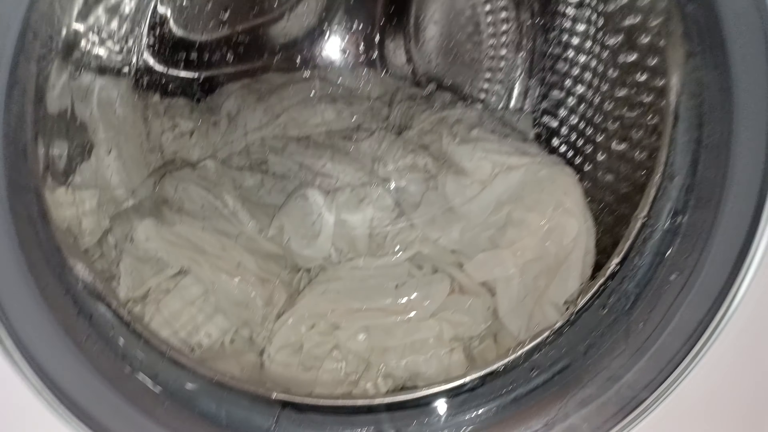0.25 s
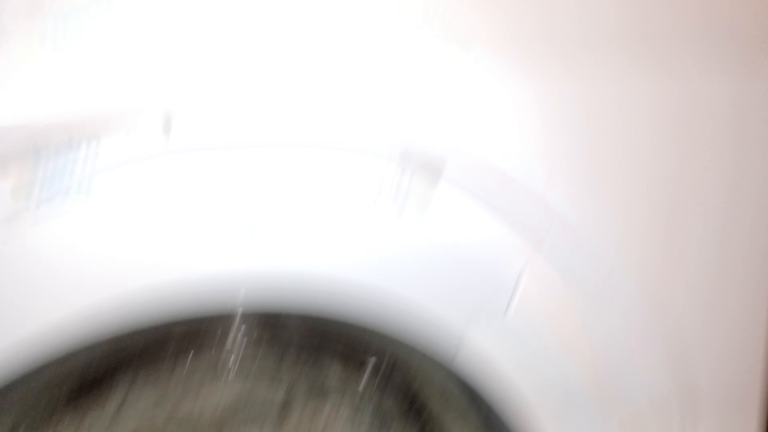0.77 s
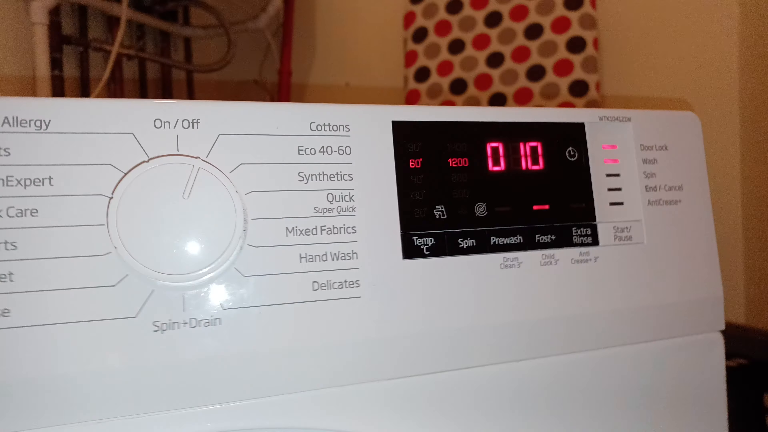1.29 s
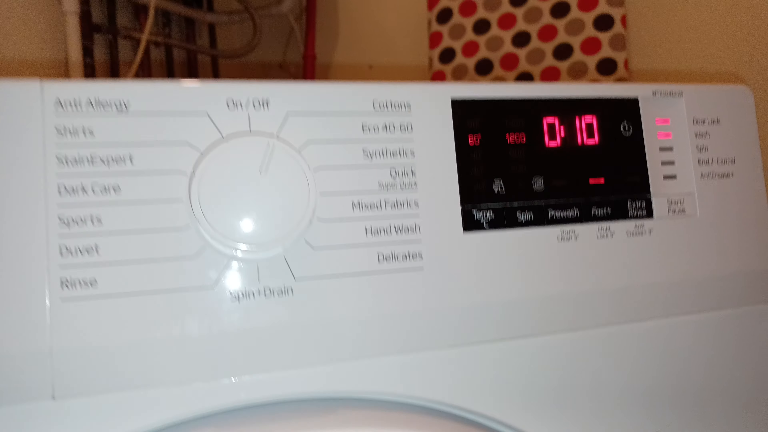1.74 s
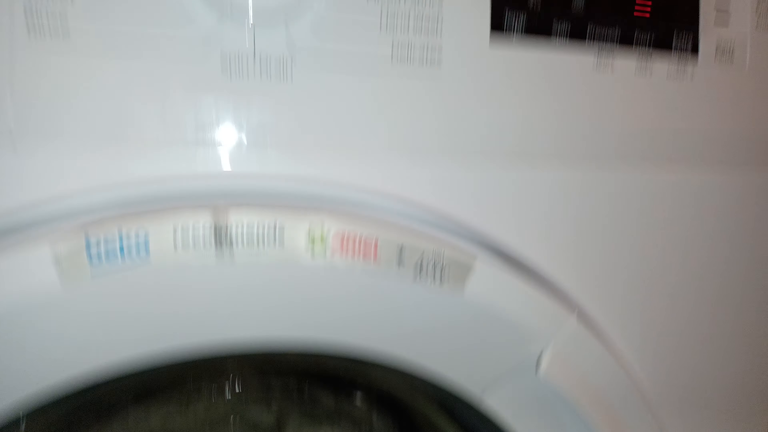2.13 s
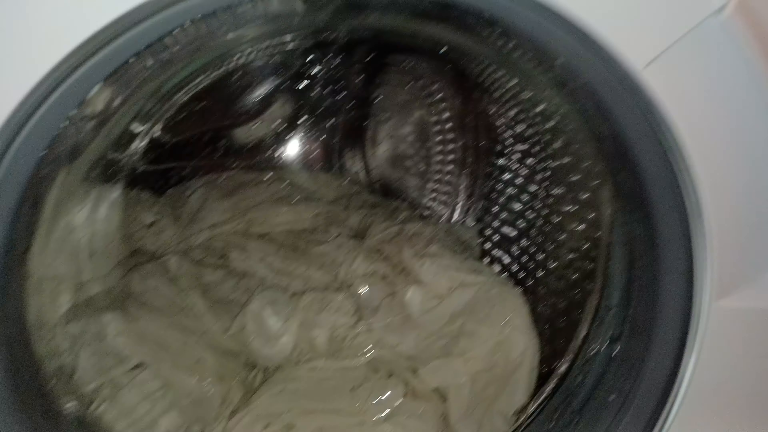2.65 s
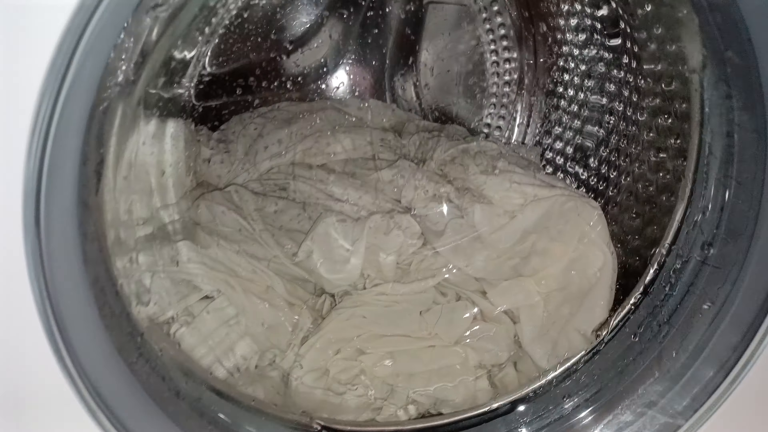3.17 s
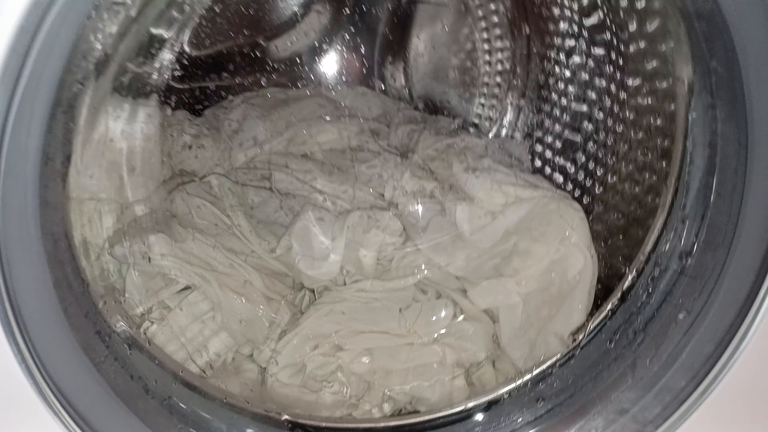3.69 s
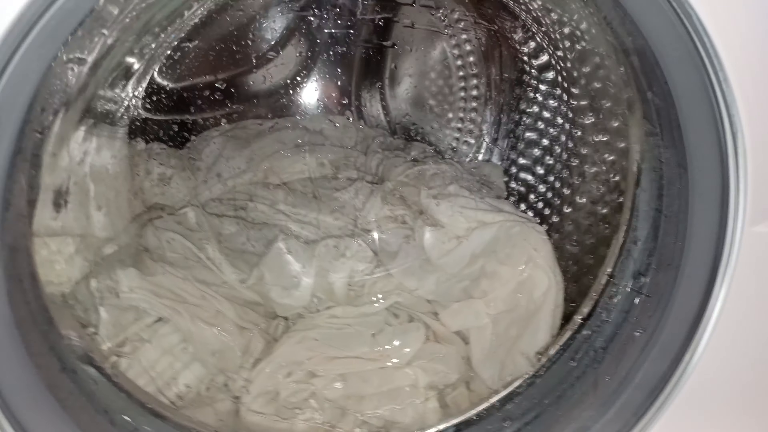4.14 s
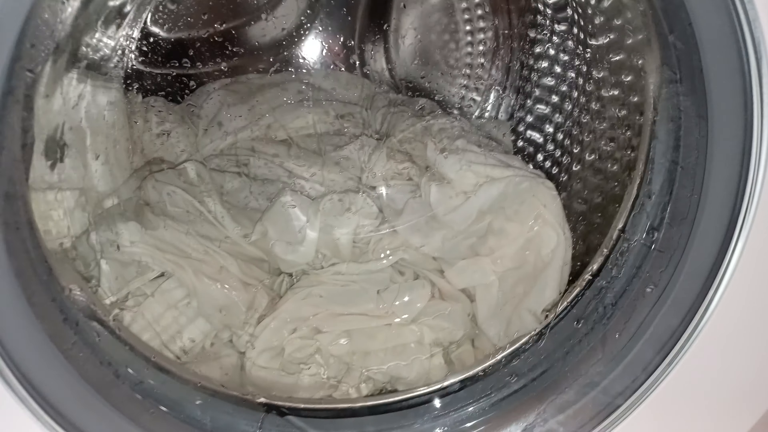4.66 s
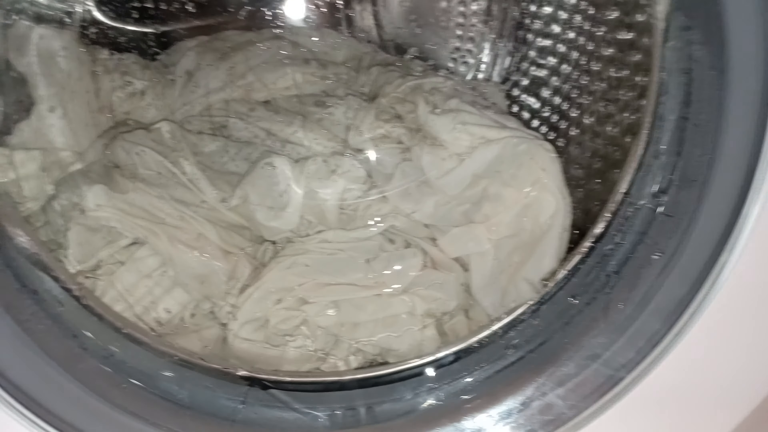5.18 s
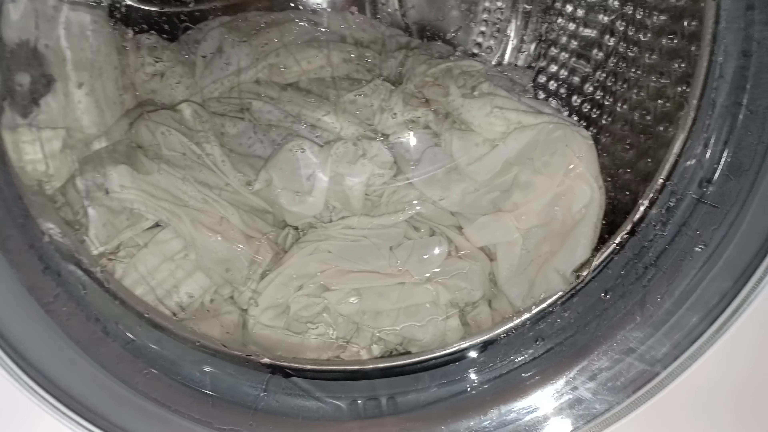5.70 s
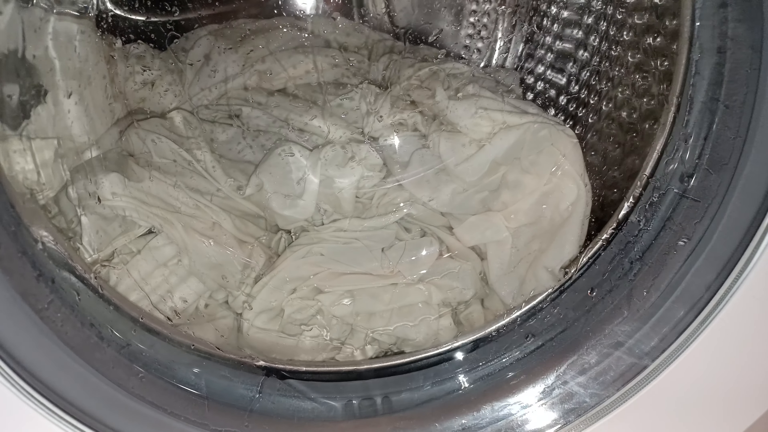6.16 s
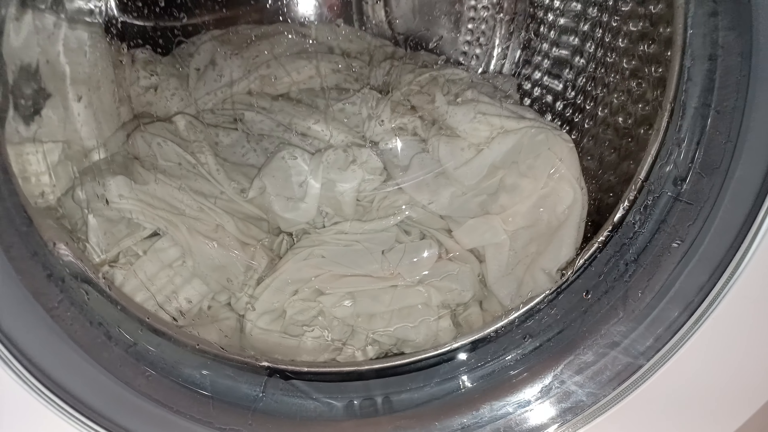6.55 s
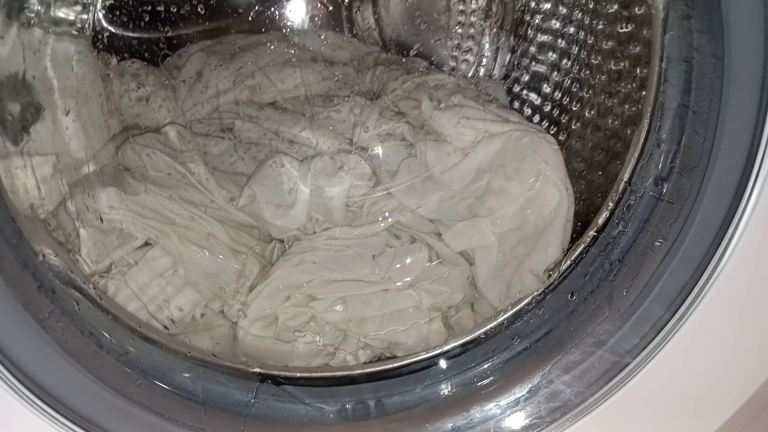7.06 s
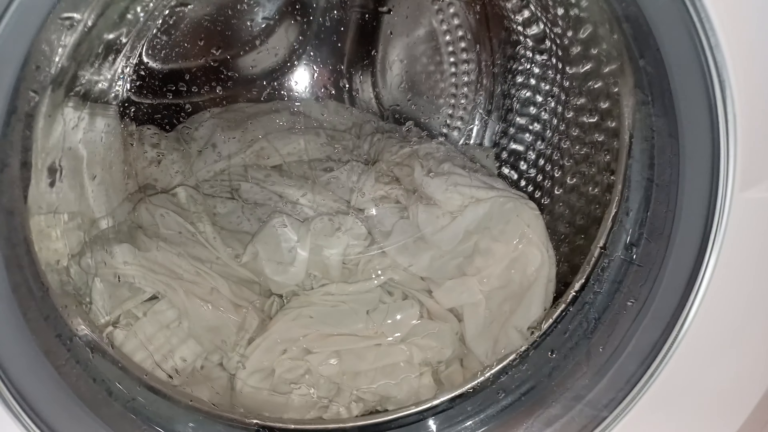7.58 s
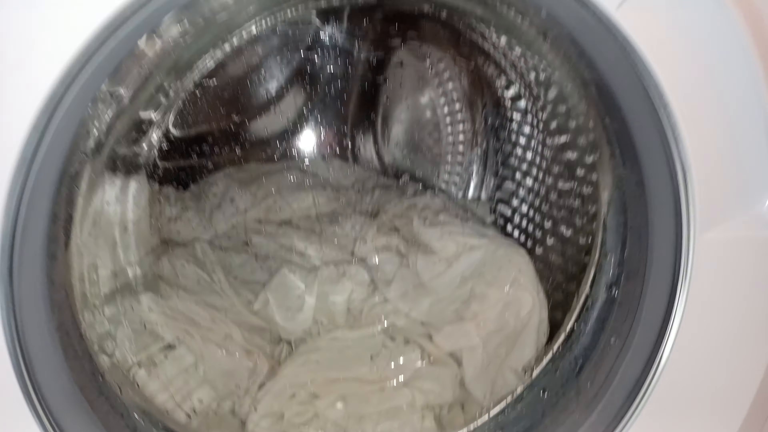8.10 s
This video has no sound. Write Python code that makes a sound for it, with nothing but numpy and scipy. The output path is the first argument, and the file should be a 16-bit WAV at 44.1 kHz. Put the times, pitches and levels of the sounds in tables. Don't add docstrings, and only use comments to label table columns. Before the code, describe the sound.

A washing machine drains in a small room, its drum still, heard about an arm's length away in stereo. Throughout, a low electric pump hum with a rough buzz sits over cabinet rumble and a broad, watery churn. From 0.1 to 0.45 s dull floor knocks come in a quick cluster, ending in the heaviest thud, with a splash. Two more thuds fall near 1.05 s, a softer group at 1.9 s with shuddering rumble, and faint ones near 2.55 and 3.2 s. The microphone turns aside around 1 to 2.5 s, subtly changing the tone; cloth rustles briefly at 2.55 s. From 3 to 5.5 s it nears the pump, the hum grows fuller and short wavering whistles around 1.5 kHz flutter from the hose, with a gulping slap at 4.5 s. After 6 s it draws back; whistles weaken, flaring at 6.7 and 7.7 s. Small drips tick near 7.4 s, and brighter wash and rustle close the sound at 8.3 s.

```python
import sys
import numpy as np
from scipy import signal
from scipy.io import wavfile
from scipy.ndimage import uniform_filter1d

SR = 44100
rng = np.random.default_rng(int(sys.argv[2]) if len(sys.argv) > 2 else 0)


def persist_wave(psi):
    counts = np.round(np.clip(psi, -1, 1) * 32767).astype(np.int16)
    wavfile.write(sys.argv[1], SR, np.atleast_2d(counts).T)


def natural_amplitude(level_db):
    exponent = np.asarray(level_db, float) / 20
    return 10 ** exponent


N = 367353
T = np.arange(N) / SR
MAINS_HZ = 49.987


def evened(x):
    return x / np.sqrt(np.mean(x ** 2) + 1e-20)


def read(points, hz):
    f, value = np.transpose(points)
    return np.interp(np.log(hz + 1), np.log(f + 1), value)


def curves(rows, t):
    s, *columns = np.transpose(rows)
    return [np.interp(t, s, c) for c in columns]


def sides(pan_db):
    pan_db = np.atleast_1d(pan_db)
    gains = natural_amplitude(np.array([pan_db / 2, -pan_db / 2]))
    return gains / np.sqrt((gains ** 2).mean(0))


def drift(top_hz):
    hz = np.geomspace(.1, top_hz, num=16)[:, None]
    t = T[::256]
    waves = np.sin(2 * np.pi * (hz * t + rng.random(hz.shape))) / np.sqrt(hz)
    return np.interp(T, t, evened(waves.sum(0)))


def bumps(t, s, db, half):
    s, db, half = (np.reshape(v, (-1, 1)) for v in (s, db, half))
    return (db * np.exp(-((t - s) / half) ** 2)).sum(0)


# (time [s], turned aside [0-1], close to the pump [0-1], drawn back [0-1])
HAND = [(0, 0, 0, 0), (.7, .1, 0, 0), (1.05, .85, 0, 0), (1.6, 1, 0, 0), (2.2, .9, .1, 0),
        (2.75, .05, .35, 0), (3.2, 0, .5, 0), (4.2, 0, .8, 0), (5.1, 0, 1, 0), (5.7, 0, 1, .25),
        (6.3, 0, 1.05, .7), (6.8, 0, 1, 1), (7.5, 0, .8, 1.05), (8.33, 0, .5, 1)]


def placed(rule, t):
    rest, *changes = rule
    return rest + np.dot(changes, curves(HAND, t))


# (frequency [Hz], correlation [-1 to 1])
LIKENESS = [(60, 1), (200, 0.89), (340, 0.75), (480, 0.072), (700, 0.15), (1100, 0.098), (1550, .15),
            (2050, 0.024), (2450, 0.96), (3500, 0.026)]
# (frequency [Hz], left minus right [dB])
BALANCE = [(60, 0), (99, 1.5), (160, -5), (270, 1.5), (450, -0.5), (740, 1.5), (1220, -2), (2010, -2.0),
           (3330, -3), (5500, -3.5), (9080, -1.5), (15000, 1.5)]
# (frequency [Hz], lead of the right side [rad])
RIGHT_LEAD = [(450, 0), (700, 1.5), (1050, -.4), (1700, -1.2), (2350, 1.4), (3100, 2.2)]


def noise(shape_db, size, patchy_db, flicker_db):
    frames = 4 * N // size + 5
    hz = np.fft.rfftfreq(size, 1 / SR)[:, None]
    t = np.arange(frames) * size / 4 / SR
    a, b, c, d, patches = rng.standard_normal((frames, len(hz), 5)).T
    patches = uniform_filter1d(patches, size=10, axis=0)
    patches = evened(uniform_filter1d(patches, size=10, axis=1))
    flicker = evened(uniform_filter1d(rng.standard_normal(frames), size=6))
    same = np.clip(read(LIKENESS, hz), -1, 1)
    left, other = a + 1j * b, c + 1j * d
    right = same * np.exp(1j * read(RIGHT_LEAD, hz)) * left + np.sqrt(1 - same ** 2) * other
    z = np.array([left, right]) * sides(read(BALANCE, hz))
    z *= natural_amplitude(shape_db(hz, t) + patchy_db * patches + flicker_db * flicker)
    return signal.istft(z, nperseg=size, noverlap=3 * size // 4)[1][:, :N] / size


def room(x, t60, wet_db, top_hz):
    t = np.arange(SR // 4) / SR
    tail = rng.standard_normal((2, len(t))) * natural_amplitude(-60 * t / t60) * (t > .002)
    tail /= np.linalg.norm(tail, axis=1, keepdims=True)
    tail = signal.lfilter(*signal.butter(2, top_hz, fs=SR), tail)
    return x + natural_amplitude(wet_db) * signal.oaconvolve(x, tail, axes=1)[:, :N]


def tone(order, db, lag=0., lead=0.14):
    turn = 2 * np.pi * order * MAINS_HZ * T - lag
    return np.sqrt(2) * natural_amplitude(db) * np.cos([turn, turn + lead])


ORDER_LEVELS = {2: (-45, 3.5, 4, .5), 3: (-49.5, -7.5, 3.5, -13.5), 4: (-43.5, -2, 6, .3),
                6: (-50.5, 2.8, 6.3, .3), 9: (-59.5, 4, -2, -5.5), 11: (-55, 4.5, -.5, -3.5),
                13: (-55.5, -1.5, -2.5, .5), 15: (-61, 0, 3, 0), 16: (-66, -2, 9, -7), 17: (-63, -3, 4, 0),
                18: (-70, 1, 8, 3)}
ORDER_PANS = {4: (-3.5, -1, 1.5, 0), 6: (0, 1, 4, -1), 9: (-13, 26, -3, 4), 11: (-7, -2, -4, 7),
              13: (-9, 17, -5, 5), 15: (0, 0, -1, 3), 16: (-3, -1, -2, 1), 17: (-5, 5, -8, 0),
              18: (2, 0, 8, 6)}


def hum():
    second, third, fourth, sixth = (placed(ORDER_LEVELS[k], T) for k in (2, 3, 4, 6))
    pan4, pan6 = placed(ORDER_PANS[4], T), placed(ORDER_PANS[6], T)
    out = tone(2, second + .3 + .4 * drift(9), lag=-1.2) * sides(.5)
    out += tone(3, third + .8 * drift(9), lag=-1.7)
    out += tone(4, fourth + .4 + .4 * drift(9), lag=1.2, lead=.2) * sides(pan4)
    out += tone(6, sixth + 1.8 * drift(12), lag=-3.0, lead=-.19) * sides(pan6)
    return out


# (order, left level [dB], right level [dB])
FAINT_ORDERS = [(5, -59, -60), (7, -67, -65), (8, -65, -66), (12, -65, -62), (14, -62, -64), (19, -68, -64),
                (25, -69, -69)]


def buzz():
    turning_lead = np.interp(T, [2.1, 2.9], [.6, 2.6])
    panels = [(11, turning_lead), (9, 1.), (13, -.8), (15, 2.), (16, .5), (17, -2.), (18, 1.5)]
    out = np.zeros((2, N))
    for order, lead in panels:
        out += tone(order, placed(ORDER_LEVELS[order], T), lead=lead) * sides(placed(ORDER_PANS[order], T))
    for order, left_db, right_db in FAINT_ORDERS:
        levels_db = np.array([left_db + 3.5 * drift(1.5), right_db + 3.5 * drift(1.5)])
        lag, lead = 2 * np.pi * rng.random(2)
        out += tone(round(order), levels_db, lag, lead)
    return out


# (frequency [Hz], level [dB per Hz])
RUMBLE_SPECTRUM = [(25, -53), (50, -13), (63, -27), (82, 4), (97, -13), (125, 3), (145, -7), (180, -12),
                   (230, -9), (260, -4), (290, -3), (340, -13), (420, -28.5), (1200, -130)]
# (time [s], level [dB], half length [s])
SHUDDERS = [
    (.3, 5.5, 0.18),
    (1.95, 5.5, 0.21),
    (2.53, -2, .15),
]
RUMBLE_DB = (-48.5, -3.5, -1, 0)


def rumble():
    def shape_db(hz, t):
        level_db = placed(RUMBLE_DB, t) + bumps(t, *np.transpose(SHUDDERS))
        return read(RUMBLE_SPECTRUM, hz) + level_db + 70
    return noise(shape_db, size=4096, patchy_db=.7, flicker_db=.3)


# (frequency [Hz], level [dB per Hz])
CHURN_SPECTRUM = [(250, -15), (370, 3.5), (430, -6), (520, 0.5), (650, 1), (930, 1), (1000, 1), (2200, 1.5),
                  (2600, -0.5), (3100, -4.5), (5100, -7.5), (5800, -13.5), (8500, -29), (13000, -62)]
# (frequency [Hz], width [Hz], level [dB])
HOSE = [(1541, 34, 0), (1850, 40, -4), (2008, 40, -8)]
# (time [s], level [dB])
POCKETS = [(.32, 11), (2.65, 1), (3.04, 12), (3.25, 6), (3.39, 14), (3.6, 7), (3.88, 4), (4.08, 9.5),
           (4.22, 1), (4.48, 4), (5.08, 3), (5.54, -1), (6.08, 2), (6.7, 12), (7.07, 3), (7.31, 3),
           (7.66, 8), (7.79, 5)]
POCKET_S = 0.041
# (time [s], centre [Hz], level [dB], half length [s])
SPLASHES = [
    (.3, 2800, 4, 0.2),
    (.385, 2300, 6.5, 0.016),
    (1.743, 2210, 6, 0.052),
    (2.62, 2100, 6, .06),
    (4.245, 2400, 4, 0.021),
    (4.476, 1900, 9.5, 0.022),
    (7.8, 1720, 7, 0.016),
    (8.2, 4500, 2, .15),
]
CHURN_DB, WHISTLE_DB = (1, -0.58, 0.091, -1.3), (-5, -1, 8.5, -4.5)
LOW_DB, HIGH_DB = (3.5, 1.5, -1.5, -2), (0.54, -0.8, -0.4, -0.65)


def water():
    def shape_db(hz, t):
        level, low, high, whistle = (placed(rule, t) for rule in (CHURN_DB, LOW_DB, HIGH_DB, WHISTLE_DB))
        low_share = np.clip(2 * np.log2(700 / (hz + 1)), 0, 1)
        high_share = np.clip(2 * np.log2((hz + 1) / 2400), 0, 1)
        churn_db = read(CHURN_SPECTRUM, hz) + level + 0.37
        churn_db += low_share * (low - level) + high_share * (high - level)
        for s, centre_hz, db, half in SPLASHES:
            octaves = np.log2((hz + 1) / centre_hz)
            churn_db += np.exp(-(octaves / .3) ** 2) * bumps(t, s, db, half)
        flutter = evened(uniform_filter1d(rng.standard_normal(len(t)), size=14))
        flares_db = bumps(t, *np.transpose(POCKETS), POCKET_S) + .8 * flutter
        peaks = sum(natural_amplitude(db) / (1 + (2 * (hz - f) / width) ** 2) for f, width, db in HOSE)
        return 20 * np.log10(natural_amplitude(churn_db) + peaks * natural_amplitude(whistle + flares_db + 3.5))
    churn = noise(shape_db, size=1024, patchy_db=1.3, flicker_db=.3)
    return room(churn, t60=.25, wet_db=-5, top_hz=1200)


def sing():
    turn = 2 * np.pi * np.cumsum(HOSE[0][0] + 9 * drift(14)) / SR
    level_db = -62 + placed(WHISTLE_DB, T) + bumps(T, *np.transpose(POCKETS), POCKET_S)
    return np.sqrt(2) * natural_amplitude(level_db) * np.cos([turn, turn - 1]) * sides(-2)


# (time [s], blow [dB], pitch factor, upper modes [dB], ring factor)
KNOCKS = [(0.115, -43.5, 1.5, -3, 0.66), (0.132, -47, 0.9, 16, 2.1), (.178, -26, 1, -17, 1.1),
          (.198, -36, 0.9, 5, 1.2), (0.2386, -24.5, 1, -2, 1.1), (0.263, -40, .93, 10, 0.8),
          (0.3049, -22, 1.01, -7, 0.87), (0.384, -35.5, 1.1, 3.5, 1.9), (0.4234, -14, 0.99, -6.5, 0.84),
          (1.0238, -18.5, 1.03, -6.5, 1), (1.091, -19.5, 1.02, 0, 1.08), (1.114, -43, 1.1, 7.5, 3.2),
          (1.879, -22.5, 0.98, -5, 1.55), (1.905, -29.5, 1.28, -1, 1.5), (1.924, -34, 1.03, -1, 1.05),
          (1.95, -35.5, 1.22, 4, 0.92), (1.971, -37, 1.1, -3, 1.5), (2.045, -39, 1.14, 9, 1.2),
          (2.47, -45, 1.01, 9, 1.1), (2.553, -29.5, 1.05, -11, 0.79), (2.581, -36.5, 1.18, 5, 0.74),
          (3.158, -39, 1.05, -8, 1.2), (3.178, -28.5, 1.1, 0, 0.88), (3.203, -32, 1.1, -19, 1.1)]
# (frequency [Hz], level [dB], swell time [s])
FLOOR_LOW = [(122, -.3, .0105), (90, -18, .03), (61, -20, .045)]
FLOOR_HIGH = [(218, -.5, .0073), (250, -8, .004), (350, -15, .004)]


def knocks():
    t, out = np.arange(SR // 3) / SR, np.zeros((2, N + SR))
    for s, blow_db, pitch, upper_db, ring in KNOCKS:
        body = np.zeros(len(t))
        for modes, db, lead in ((FLOOR_LOW, blow_db, -.8), (FLOOR_HIGH, blow_db + upper_db, .9)):
            for hz, mode_db, swell in modes:
                u = t / (swell * ring)
                envelope = (u * np.exp(1 - u)) ** 2
                body -= natural_amplitude(db + mode_db) * envelope * np.sin(2 * np.pi * hz * pitch * t + lead)
        late = np.roll(body, round(0.00031 * SR))
        out[:, round(s * SR):][:, :len(t)] += np.array([late, body]) * sides(-1.4)
    return out[:, :N]


# (frequency [Hz], level [dB per Hz])
RUSTLE_SPECTRUM = [(2500, -50), (4500, 5.5), (6500, 3.5), (7200, 5), (8400, -1.5), (10500, -0.5),
                   (13000, 2), (15000, -4.5), (15800, 1)]
# (time [s], rustle level [dB])
CLOTH_MOVES = [(0, -63.3), (.33, -62.8), (.44, -61.5), (.55, -63.5), (.85, -62), (1.32, -62), (1.6, -65),
               (2.0, -63.3), (2.4, -63), (2.49, -58), (2.56, -54), (2.65, -57.5), (2.76, -63.5),
               (3.16, -64.3), (3.2, -61), (3.45, -60), (7.8, -59.6), (8.2, -58.3)]


def cloth():
    def shape_db(hz, t):
        level, = curves(CLOTH_MOVES, t)
        share = np.clip((hz - 6000) / 3000, .3, 1)
        dull_db = np.clip((hz - 11800) / 2400, 0, 1.7) * 1.4 * np.minimum(level + 60.2, 0)
        return read(RUSTLE_SPECTRUM, hz) + 1.1 * share * (level + 61) + dull_db - 25.5
    return noise(shape_db, size=256, patchy_db=0.93, flicker_db=0.36)


# (time [s], level [dB], low [Hz], high [Hz], length [s])
TICKS = [(.241, -49, 10500, 14000, .0008), (.3085, -48, 9000, 14500, .0009),
         (.426, -36, 8500, 15700, .0008), (1.0269, -48, 11000, 15700, .001),
         (1.0925, -49, 11500, 15700, .0007), (1.2936, -50, 11000, 15000, .001),
         (2.5459, -44, 9000, 15000, .0008), (2.5566, -45, 9000, 15000, .0008),
         (2.622, -47, 9000, 15000, .0008), (7.39, -52, 3400, 5400, .012), (7.472, -46, 4100, 5600, .004),
         (7.495, -52, 3600, 5600, .015)]


def ticks():
    t, out = np.arange(-2048, 2048) / SR, np.zeros((2, N))
    for s, db, low_hz, high_hz, length in TICKS:
        band = signal.butter(3, [low_hz, high_hz], "bandpass", fs=SR, output="sos")
        puff = evened(signal.sosfilt(band, rng.standard_normal((2, len(t)))))
        puff *= np.exp(-(t / length) ** 2)
        out[:, round((s + t[0]) * SR):][:, :len(t)] += puff * natural_amplitude([[db - 12], [db]])
    return out


def scene():
    return hum() + buzz() + rumble() + water() + sing() + knocks() + cloth() + ticks()


def top_cut(x):
    return signal.sosfilt(signal.butter(12, 15770, fs=SR, output="sos"), x)


def record(dry):
    low_cut = signal.butter(2, 48, "highpass", fs=SR, output="sos")
    mix = signal.sosfilt(low_cut, dry)
    return top_cut(mix)


dry = scene()
out = record(dry)
persist_wave(out)
```